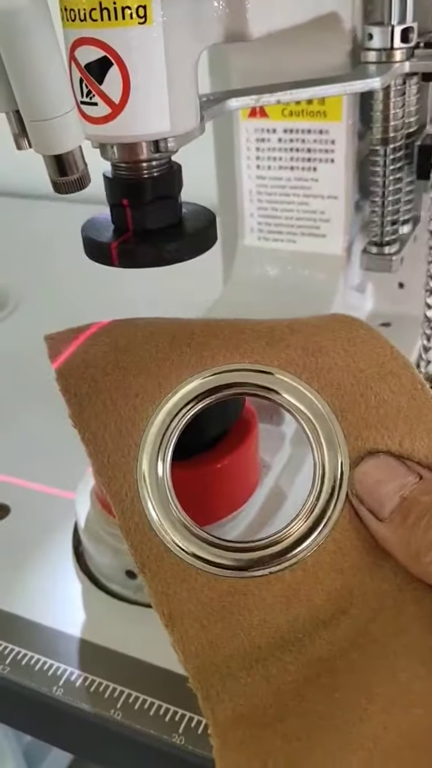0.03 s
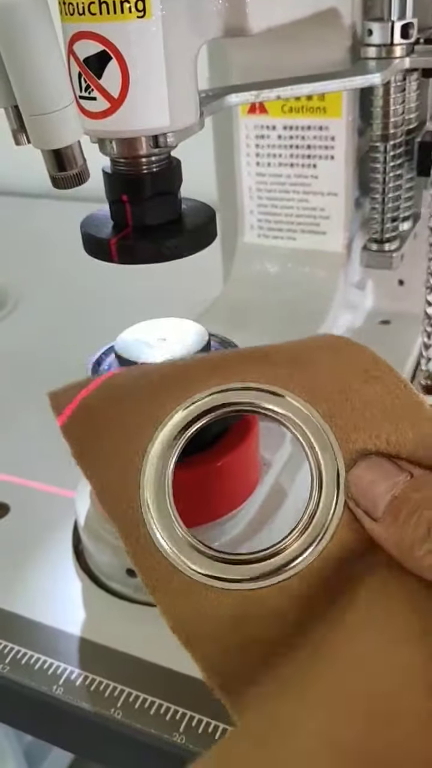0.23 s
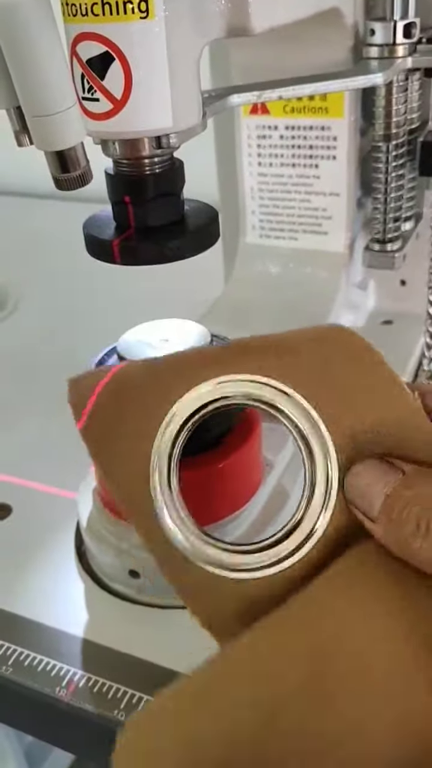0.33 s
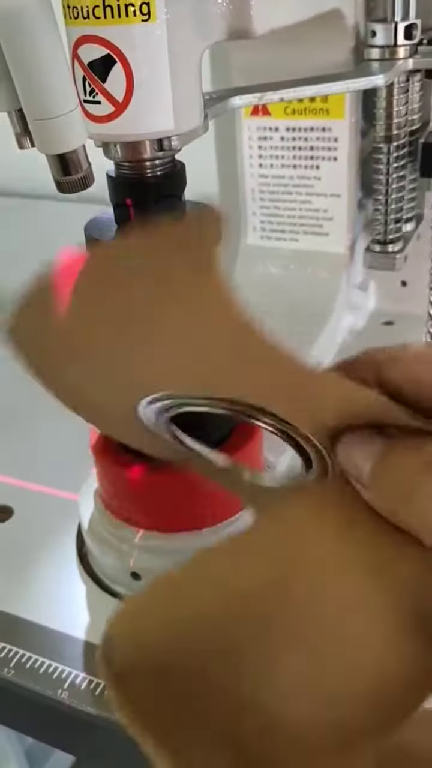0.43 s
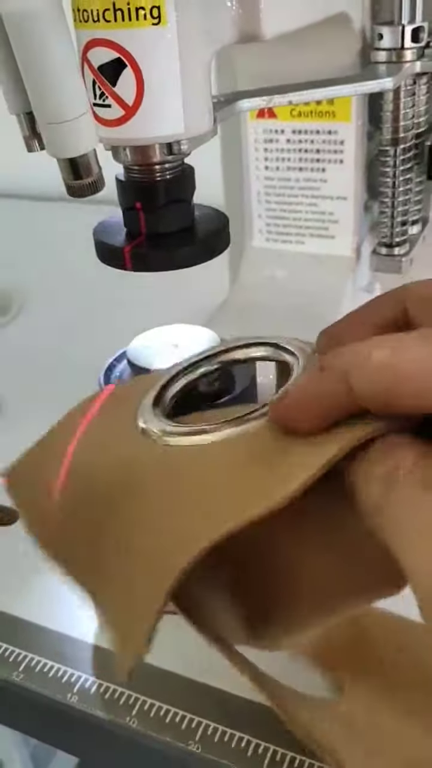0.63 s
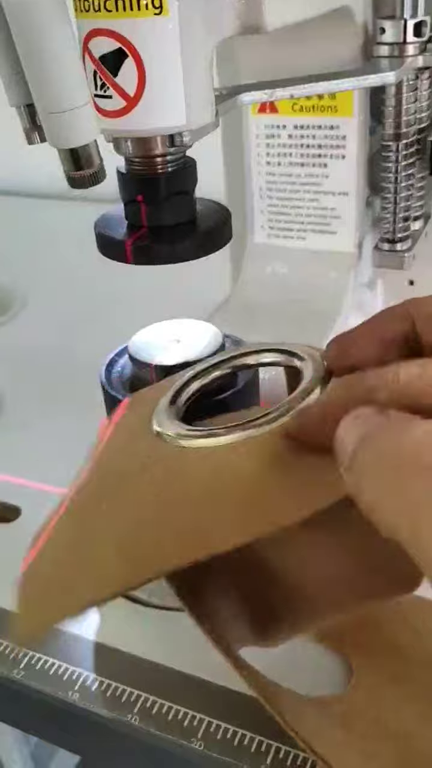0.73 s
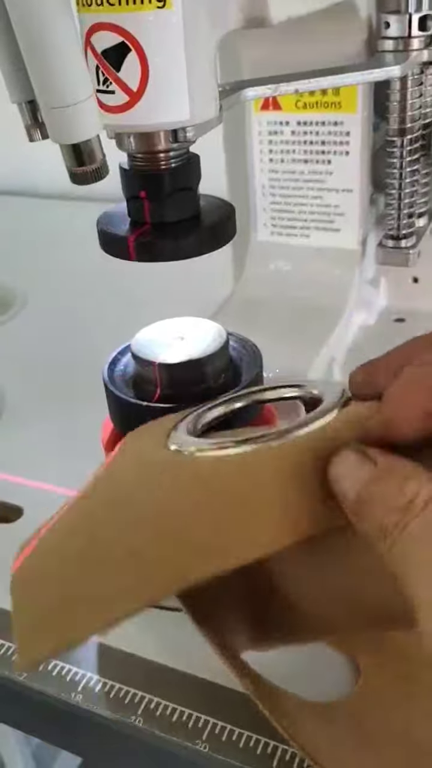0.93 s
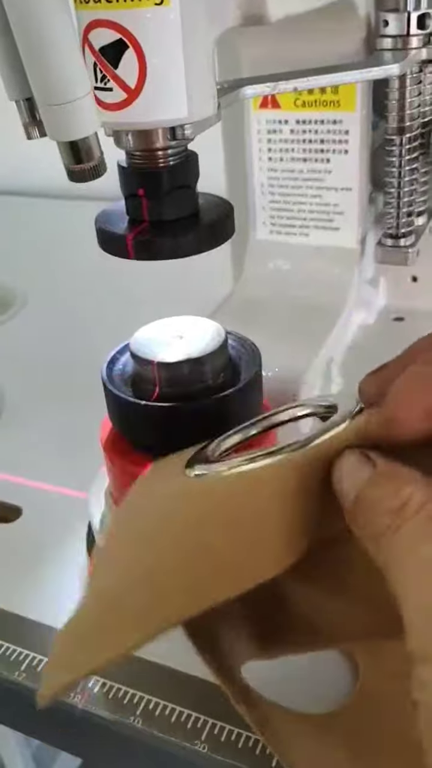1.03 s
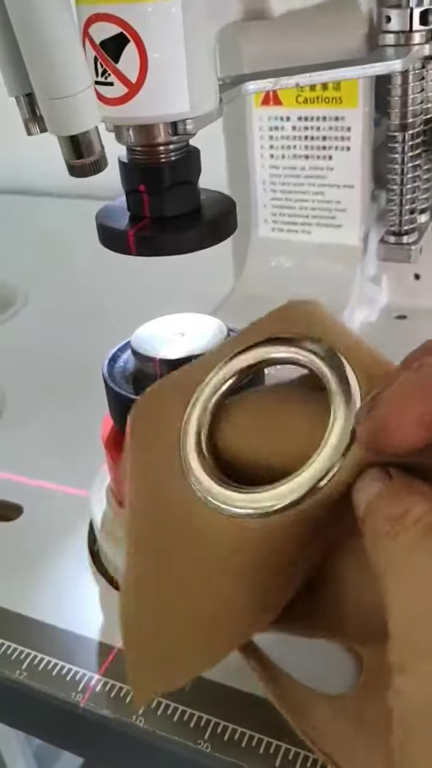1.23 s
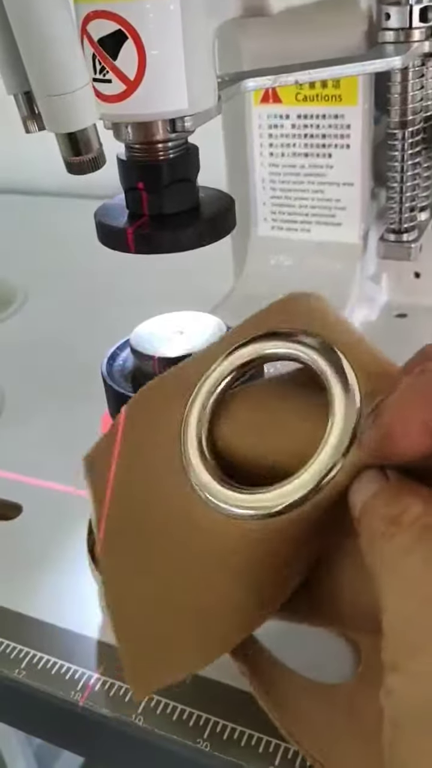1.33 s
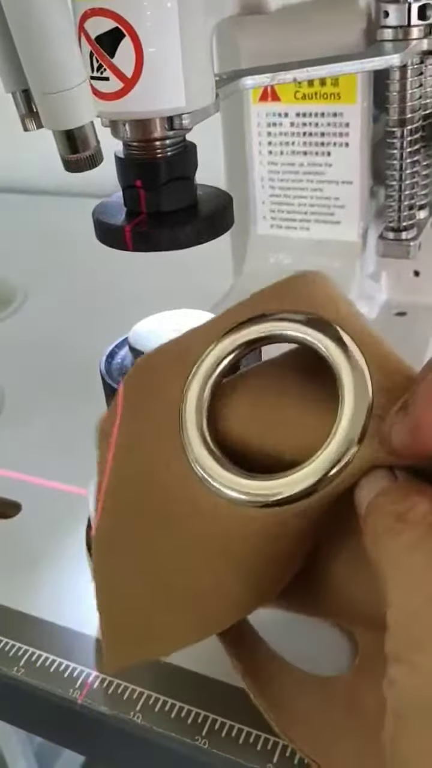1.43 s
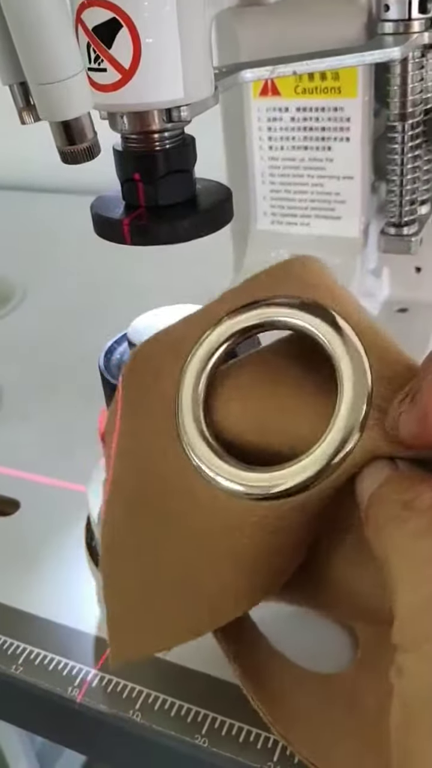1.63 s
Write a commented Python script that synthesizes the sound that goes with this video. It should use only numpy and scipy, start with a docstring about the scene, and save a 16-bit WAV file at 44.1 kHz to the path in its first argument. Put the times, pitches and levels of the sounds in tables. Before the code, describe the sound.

Fabric is handled with a low, droning rumble that swells from about 0.2 seconds, peaks around 0.5 to 0.7 and fades by 1.2. Dull rubbing and a few soft bumps come with it, and a light cloth swish near 0.8. A metal eyelet grazes and clinks very faintly until about 1.5 seconds. An idling machine hums quietly in the room throughout.

```python
"""Indoors, beside an idling punching machine, fabric with a metal eyelet is turned over by hand.
A low droning rumble swells and fades, with dull rubbing and soft bumps of handling above it.
Sliding cloth fibres swish softly; metal grazes and clinks in very faint, thin tones.
Under it all lie the machine's quiet hum and room noise."""
import sys
import numpy as np
from scipy import signal
from scipy.fft import rfft, irfft, next_fast_len
from scipy.io import wavfile
from scipy.ndimage import uniform_filter1d, map_coordinates

SR = 44100
rng = np.random.default_rng(int(sys.argv[2]) if len(sys.argv) > 2 else 0)


def int16_out(signal):
    """Quantize to a 16-bit WAV file."""
    q = np.round(np.clip(np.atleast_2d(signal).T, -1, 1) * 32767)
    wavfile.write(sys.argv[1], SR, q.astype(np.int16))


N = 74970

# Stereo image of the handling noises. Each row: frequency in Hz, left-right likeness from 0 to 1.
NEAR_LIKENESS = [(60, 1), (300, 0.88), (650, 0.1), (1400, 0.2)]
# Their balance. Each row: frequency in Hz, left minus right in dB.
NEAR_BALANCE = [(50, 3.5), (150, 0.5), (290, 5.5), (450, 1), (820, 8.5), (1050, -8), (1900, 11), (3300, -2),
                (5400, 5)]
LOW_PAN_DB, METAL_PAN_DB = 1.4, 2.5
METAL_JITTER_RAD = 0.5


def amp(db):
    """Decibels to gain."""
    return 10 ** (np.asarray(db) / 20)


def pan_left(x, db):
    """Mono to stereo: left raised by db, right lowered by db."""
    return x * amp([[db], [-db]])


def along(points, hz):
    """(Hz, value) points read on a log axis."""
    knots_hz, values = np.transpose(points)
    return np.interp(np.log(hz + 1), np.log(knots_hz + 1), values)


def envelope(rows):
    """Gain per sample from (s, dB) points."""
    times_s, db = np.transpose(rows)
    return amp(np.interp(np.arange(N) / SR, times_s, db))


def wobble(rate_hz):
    """Smooth random curve, rate_hz knots a second."""
    knots = rng.standard_normal(int(N * rate_hz / SR) + 4)
    return map_coordinates(knots, [np.arange(N) * rate_hz / SR])


def noise(spectrum, likeness=NEAR_LIKENESS, balance=NEAR_BALANCE):
    """Coloured stereo noise whose channel mean has rms 1."""
    size = next_fast_len(N + 8192)
    hz = np.fft.rfftfreq(size, 1 / SR)
    width_rad = np.arccos(np.clip(along(likeness, hz), -1, 1)) / 2
    coloured = rfft(rng.standard_normal((2, size))) * amp(along(spectrum, hz))
    mid, side = coloured * [np.cos(width_rad), np.sin(width_rad)]
    tilt = amp(along(balance, hz) / 2)
    pair = irfft(np.array([(mid + side) * tilt, (mid - side) / tilt]), size)[:, :N]
    return pair / np.sqrt(np.mean(pair.mean(0) ** 2))


def steadied(pair, span_s):
    """Even out a noise's chance swells so that it sounds sustained."""
    power = np.abs(signal.hilbert(pair.mean(0))) ** 2 / 2
    width = max(int(span_s * SR), 2)
    smooth_power = uniform_filter1d(uniform_filter1d(power, width), width)
    return pair / np.sqrt(np.abs(smooth_power) + 1e-6)


def machine_idle(waver_db=1.2, room_db=-63.5):
    """The machine's slightly wavering hum lines over room noise."""
    # Each row: frequency in Hz, rms level in dB before panning.
    hum_lines = [(59.2, -75), (263.8, -85), (547, -90.5), (646, -87.5), (840, -96), (969, -91)]
    # Each row: frequency in Hz, relative density in dB.
    room_spectrum = [(10, -22), (24, 5), (38, -10.5), (65, 0), (110, -14), (200, -23.5), (350, -25.5),
                     (430, -34.5), (650, -32.5), (900, -49), (1010, -21.5), (1120, -34.5), (3600, -41.5),
                     (15200, -53.5)]
    # Each row: frequency in Hz, left-right likeness from 0 to 1.
    room_likeness = [(60, 0.98), (290, 0.96), (640, 0)]
    # Each row: frequency in Hz, left minus right in dB.
    room_balance = [(60, 4.5), (160, 1), (450, 10.5), (1150, -4.5), (2000, 13.5), (3300, 1)]
    t, hum = np.arange(N) / SR, np.zeros(N)
    for hz, db in hum_lines:
        gain = amp(db + waver_db * wobble(6)) * np.sqrt(2)
        hum += gain * np.sin(2 * np.pi * hz * t + 0.3 * wobble(4))
    return pan_left(hum, db=-0.5) + amp(room_db) * noise(room_spectrum, room_likeness, room_balance)


def metal_clinks(attack_s=0.003, t60_s=0.085, rebound_s=0.037, rebound_loss_db=5.5):
    """Loose metal touches, rings briefly and rebounds once, more softly."""
    # Each row: start in seconds, pitch in Hz, level in dB before attack and panning.
    touches = [(0.02, 5840, -83), (0.325, 5940, -76.5), (.382, 5840, -72.5), (.684, 5890, -77.5),
               (.793, 2330, -73), (0.811, 5860, -74.5), (.832, 5860, -76.5), (.866, 5390, -76),
               (.9, 2340, -72.5), (0.93, 5960, -76), (1.011, 5793, -81), (1.07, 5880, -81.5),
               (1.09, 2316, -74), (1.122, 2354, -79), (1.345, 5940, -79), (1.423, 2350, -72.5),
               (1.46, 2310, -72)]
    t, out = np.arange(N) / SR, np.zeros(N)
    for touch_s, hz, db in touches:
        gap_s = rebound_s * np.exp(0.2 * rng.standard_normal())
        for start_s, hit_db in [(touch_s, db), (touch_s + gap_s, db - rebound_loss_db)]:
            age_s = np.maximum(t - start_s, 0)
            shape = amp(hit_db - 60 * age_s / t60_s) * (1 - np.exp(-(age_s / attack_s) ** 2))
            out += shape * np.sin(2 * np.pi * hz * age_s + METAL_JITTER_RAD * wobble(120))
    return pan_left(out, METAL_PAN_DB)


def rubbing(low_gain_db=2.45):
    """Dull friction of handling: a low rub with a light scrape over it, joined by a higher rub."""
    # Envelopes. Each row: time in seconds, relative level in dB.
    scrape_levels = [(0.05, -90), (0.155, -63), (0.22, -72), (0.29, -67.5), (0.42, -65.5), (0.55, -99.5)]
    low_levels = [(0.026, -100.5), (0.062, -71.5), (0.124, -52.5), (0.222, -52), (0.336, -43), (0.428, -44),
                  (0.738, -56.5), (1.096, -84), (1.128, -72.5), (1.25, -86)]
    high_levels = [(0.2, -83), (0.34, -59.5), (0.42, -56.5), (0.49, -53.5), (0.55, -57.5), (0.61, -57),
                   (0.69, -62), (0.78, -75.5), (1.05, -86.5)]
    # Spectra. Each row: frequency in Hz, relative density in dB.
    scrape_spectrum = [(560, -43), (660, -16.5), (840, 0), (1020, -3.5), (1150, -27), (4000, -43)]
    low_spectrum = [(90, -27.5), (180, -4.5), (235, 1), (290, -4.5), (380, -7), (440, -27), (600, -41.5),
                    (1600, -130)]
    high_spectrum = [(300, -18), (450, 3.5), (540, 0), (590, -8.5), (650, 2.5), (790, -1), (930, 2.5),
                     (1040, -15.5), (1150, -23.5), (1680, -20.5), (2050, -35), (3000, -32.5), (6000, -84.5)]
    scrape = envelope(scrape_levels) * noise(scrape_spectrum)
    low = envelope(low_levels) * steadied(noise(low_spectrum), span_s=0.13)
    high = envelope(high_levels) * steadied(noise(high_spectrum), span_s=0.36)
    return scrape + amp(low_gain_db) * low + high


def drone(core_db=-5, rumble_db=-3.5, jitter_rad=0.45):
    """A rough resonance wanders round 70 Hz inside a broader rumble; both swell and die away."""
    # Each row: time in seconds, relative level in dB.
    swell_levels = [(0.08, -78), (0.16, -49), (0.212, -35.5), (0.245, -44.5), (0.33, -30), (0.41, -28.5),
                    (0.436, -30), (0.495, -23.5), (0.555, -35), (0.615, -24), (0.642, -33.5), (0.68, -27),
                    (0.738, -38), (0.778, -31), (0.815, -37), (0.94, -39.5), (0.99, -37.5), (1.055, -51.5),
                    (1.115, -49), (1.155, -64), (1.195, -57.5), (1.25, -73.5)]
    # Each row: time in seconds, pitch in Hz.
    core_pitch = [(.22, 80.1), (.35, 65.83), (.48, 71.06), (.6, 76.1), (0.679, 60.13), (0.869, 64.33),
                  (.99, 75.15)]
    # Each row: frequency in Hz, relative density in dB.
    rumble_spectrum = [(12, -27), (25, -11), (36, -11.5), (55, -1), (70, -4), (118, -5), (140, -12.5),
                       (164, -12), (190, -30), (1400, -125)]
    times_s, hz = np.transpose(core_pitch)
    phase = 2 * np.pi * np.cumsum(np.interp(np.arange(N) / SR, times_s, hz)) / SR
    core = pan_left(np.sqrt(2) * np.sin(phase + jitter_rad * wobble(30)), LOW_PAN_DB)
    rumble = steadied(noise(rumble_spectrum), span_s=0.038)
    return envelope(swell_levels) * (amp(core_db) * core + amp(rumble_db) * rumble)


def soft_bumps(attack_s=0.0068, jitter_rad=0.52):
    """Cushioned contacts of handling, each a dull, quickly damped tone."""
    # Each row: start in seconds, pitch in Hz, level in dB before attack and panning, T60 in seconds.
    contacts = [(0.094, 237.5, -41.5, .2), (0.439, 774, -39, 0.045), (0.486, 662, -35, 0.055),
                (0.745, 162.8, -36, 0.31), (0.843, 174.6, -37, 0.11), (1.116, 250, -55, 0.093)]
    t, out = np.arange(N) / SR, np.zeros(N)
    for start_s, hz, db, t60_s in contacts:
        age_s = np.maximum(t - start_s, 0)
        shape = amp(db - 60 * age_s / t60_s) * (1 - np.exp(-age_s / attack_s))
        out += shape * np.sin(2 * np.pi * hz * age_s + jitter_rad * wobble(70))
    return pan_left(out, LOW_PAN_DB)


def metal_grazes(chatter_db=2):
    """Thin, chattering metal tones each swell and fade; most come from metal sliding along metal."""
    # Each row: centre in seconds, pitch in Hz, relative peak in dB, half length in seconds.
    grazes = [(.18, 1770, -80.5, 0.021), (.22, 2580, -81.5, .03), (.262, 2267, -78.5, 0.017),
              (.275, 4880, -85, 0.018), (.405, 4880, -80.5, 0.041), (.428, 5890, -78.5, 0.027),
              (0.424, 2957, -82, 0.044), (.455, 2260, -76.5, 0.013), (.482, 4880, -84, 0.022),
              (.525, 1665, -74.5, .05), (.632, 1774, -72.5, 0.016), (.64, 4880, -81, .015),
              (1.265, 7380, -83.5, .04)]
    t, out = np.arange(N) / SR, np.zeros(N)
    for centre_s, hz, db, half_s in grazes:
        shape = amp(db + chatter_db * wobble(120)) * np.exp(-((t - centre_s) / half_s) ** 2)
        out += shape * np.sin(2 * np.pi * hz * t + METAL_JITTER_RAD * wobble(120))
    return pan_left(out, METAL_PAN_DB)


def cloth_swish(grain_db=1.0):
    """Sliding fibres make a fine, grainy hiss, with a few thinner scratches along the metal."""
    # Each row: time in seconds, level in dB.
    hiss_levels = [(0.25, -101), (0.5, -81.5), (0.745, -81.5), (0.762, -73.5), (0.785, -74), (0.798, -81),
                   (0.815, -76.5), (0.86, -83.5), (1.35, -84), (1.6, -91)]
    # Each row: centre in seconds, half length in seconds, level in dB.
    scratches = [(.35, .035, -87.5), (.5, 0.083, -83), (.8, .04, -78)]
    # Spectra. Each row: frequency in Hz, relative density in dB.
    hiss_spectrum = [(1200, -12), (3000, -2), (4500, -9.5), (6500, 1), (8100, -6), (8900, -4.5),
                     (12500, 8.5), (15500, -3)]
    scratch_spectrum = [(8300, -24.5), (8850, 3.5), (10200, -0.5), (11500, -18)]
    t = np.arange(N) / SR
    strokes = sum(amp(db) * np.exp(-((t - centre_s) / half_s) ** 2) for centre_s, half_s, db in scratches)
    scratch = strokes * noise(scratch_spectrum)
    grain = amp(grain_db * wobble(130))
    hiss = envelope(hiss_levels) * noise(hiss_spectrum)
    return grain * (hiss + scratch)


def scene():
    """All sources, summed in stereo."""
    handling = drone() + rubbing() + soft_bumps() + cloth_swish() + metal_grazes() + metal_clinks()
    return handling + machine_idle()


def record(dry):
    """Brick-wall low-pass."""
    cutoff_hz = 15480
    size = next_fast_len(N + SR // 2)
    passband = np.fft.rfftfreq(size, 1 / SR) < cutoff_hz
    return irfft(rfft(dry, size) * passband, size)[..., :N]


dry = scene()
out = record(dry)
int16_out(out)
```